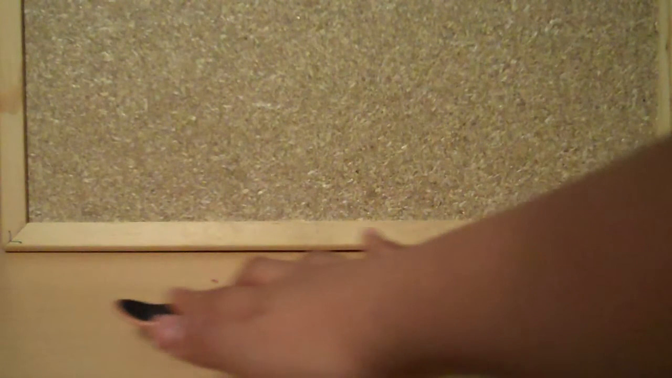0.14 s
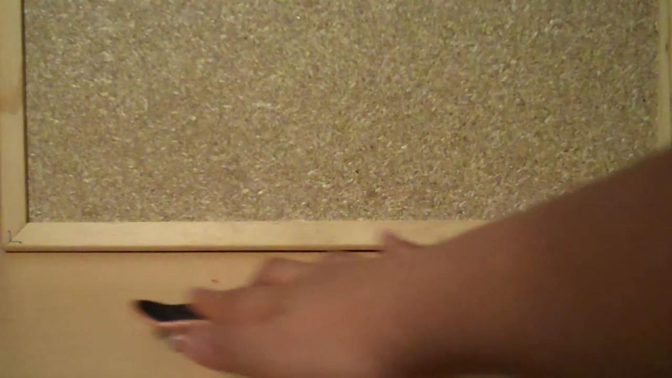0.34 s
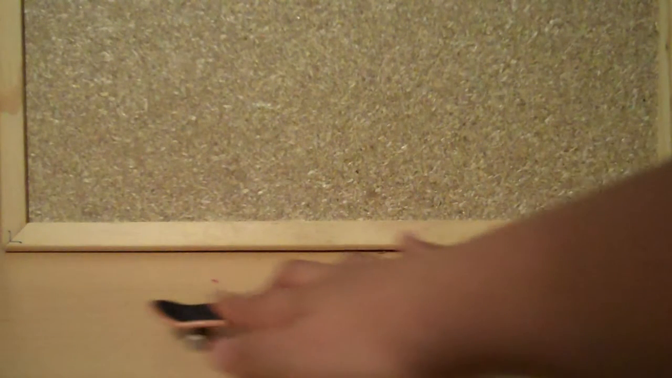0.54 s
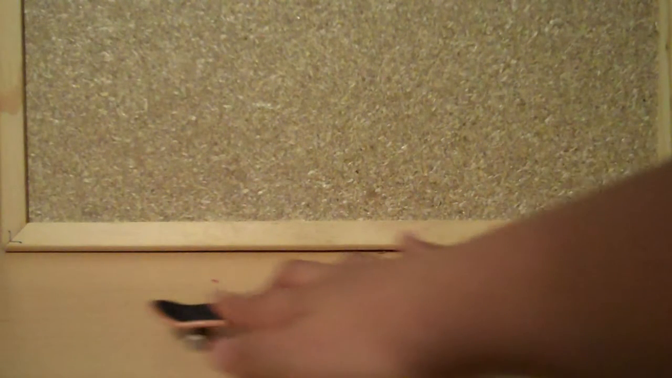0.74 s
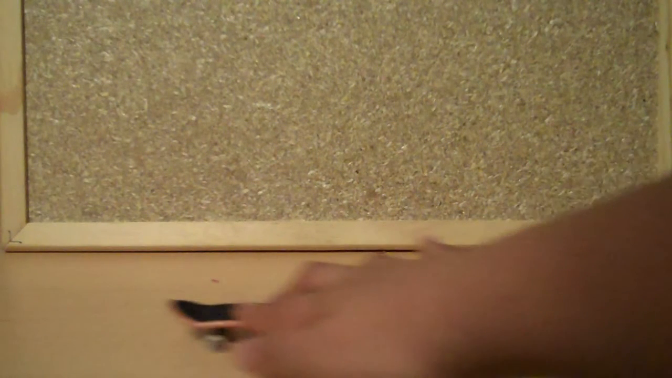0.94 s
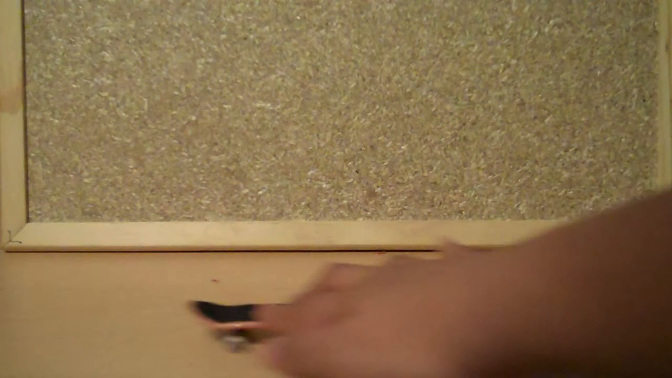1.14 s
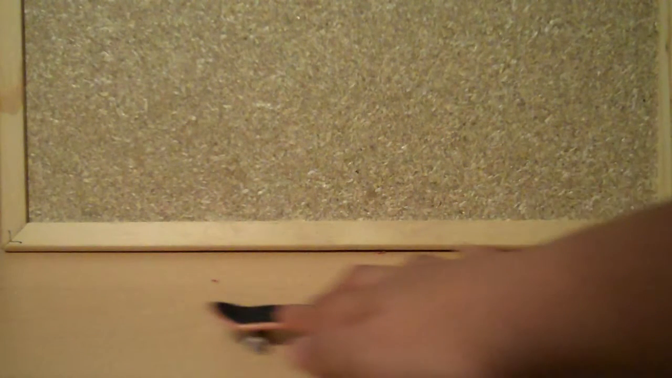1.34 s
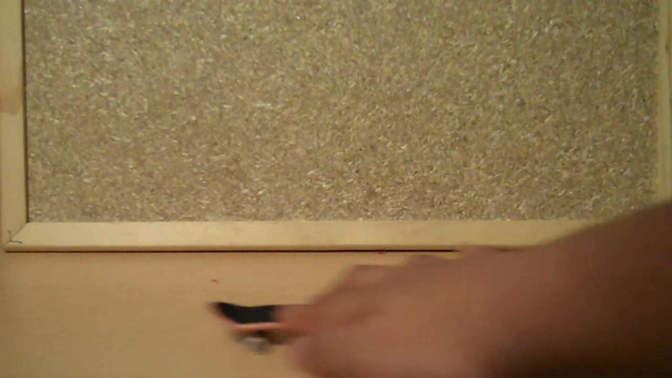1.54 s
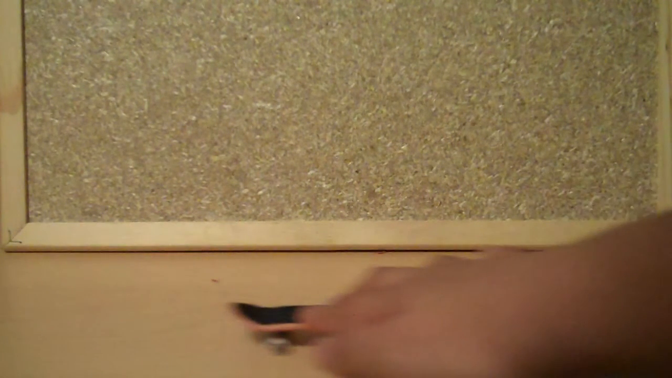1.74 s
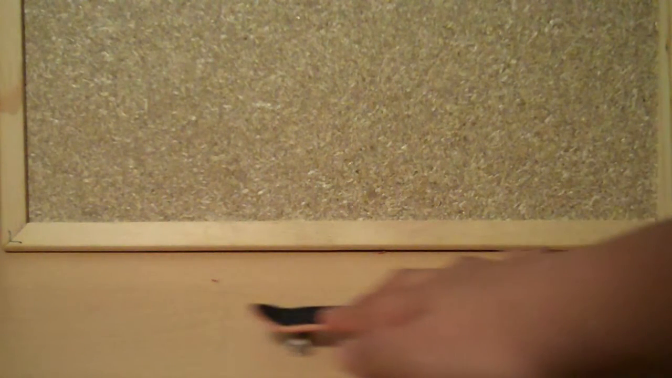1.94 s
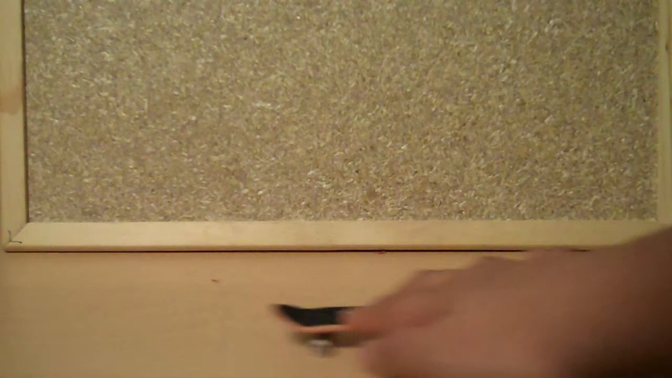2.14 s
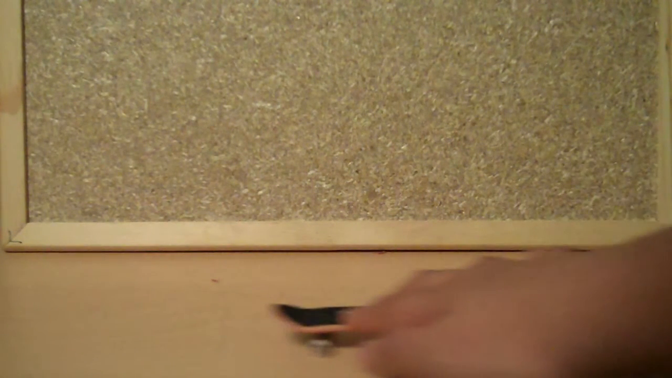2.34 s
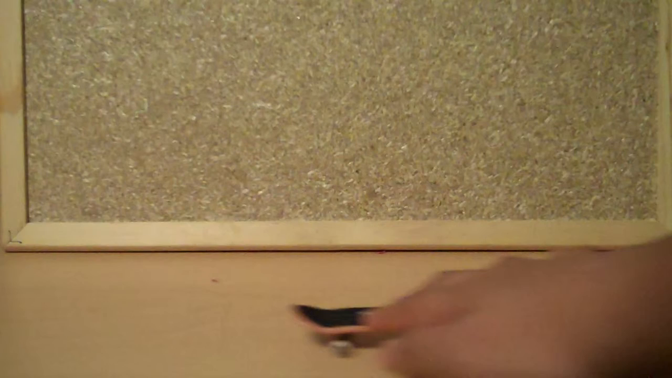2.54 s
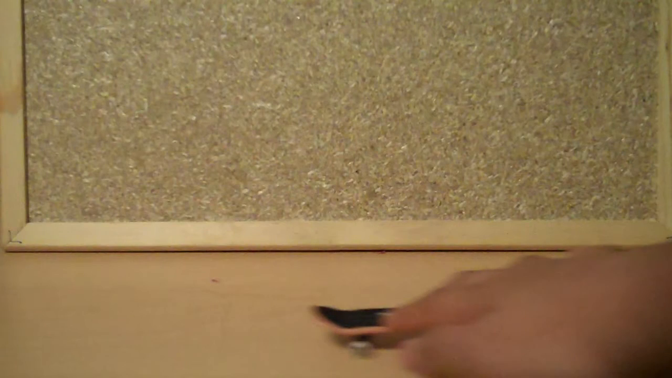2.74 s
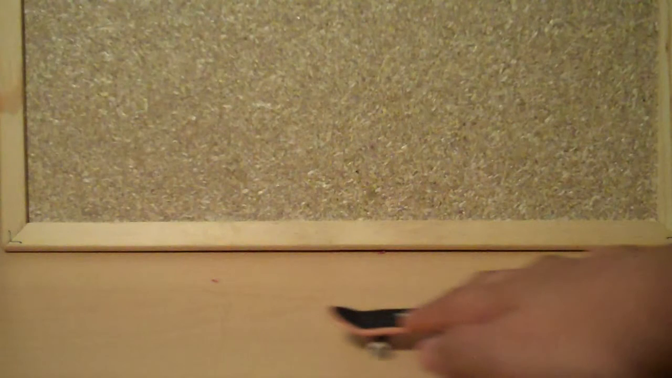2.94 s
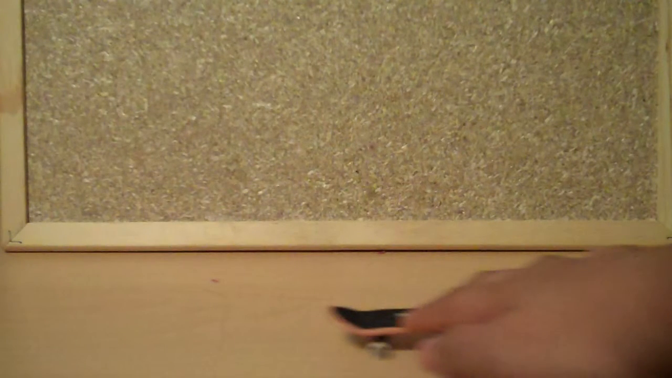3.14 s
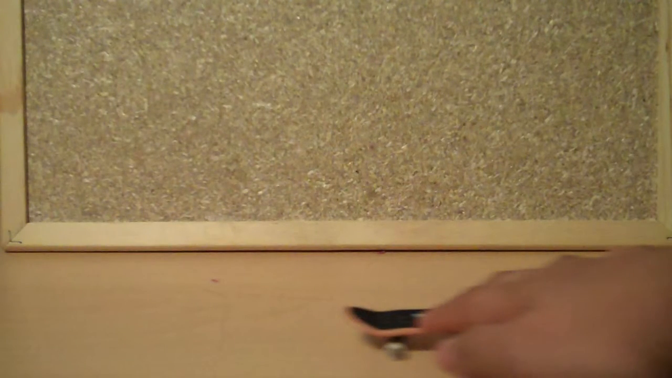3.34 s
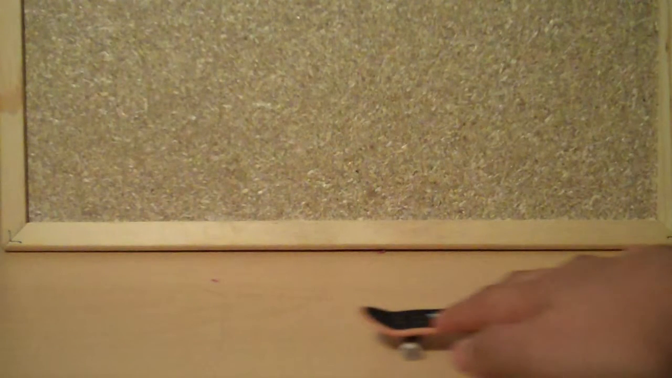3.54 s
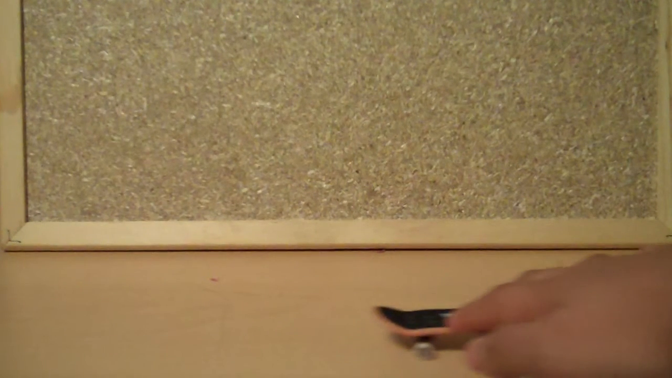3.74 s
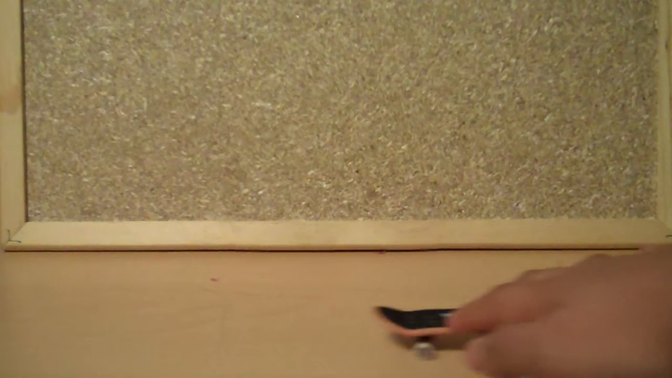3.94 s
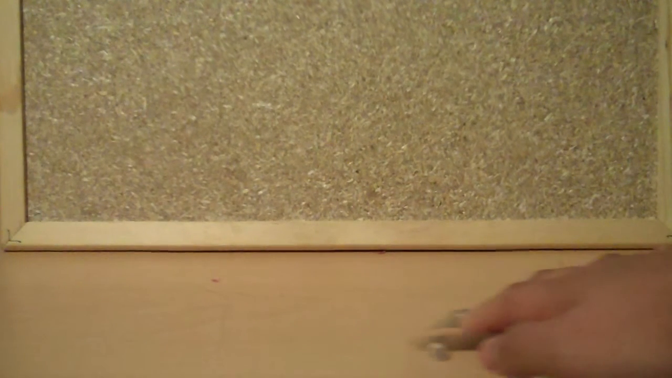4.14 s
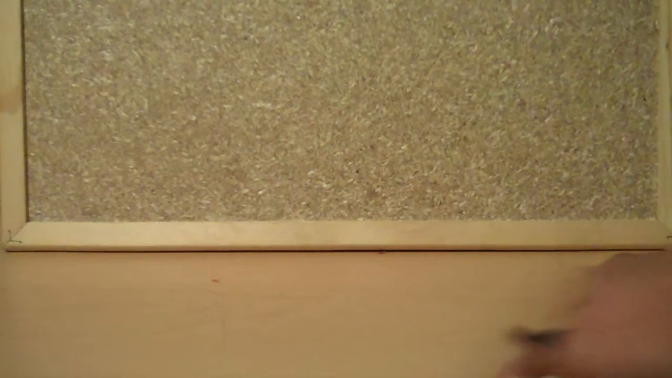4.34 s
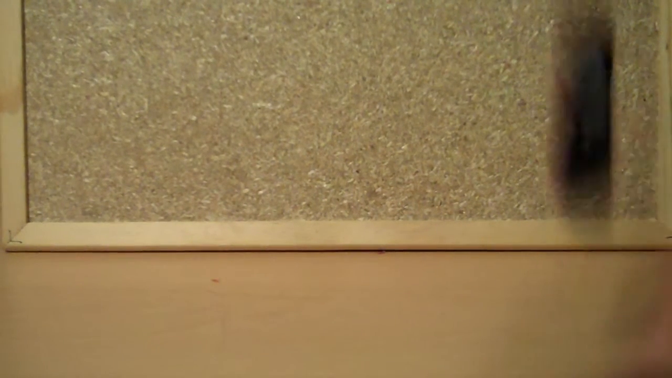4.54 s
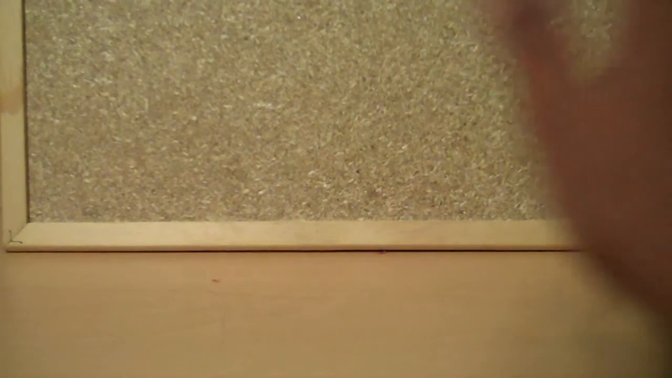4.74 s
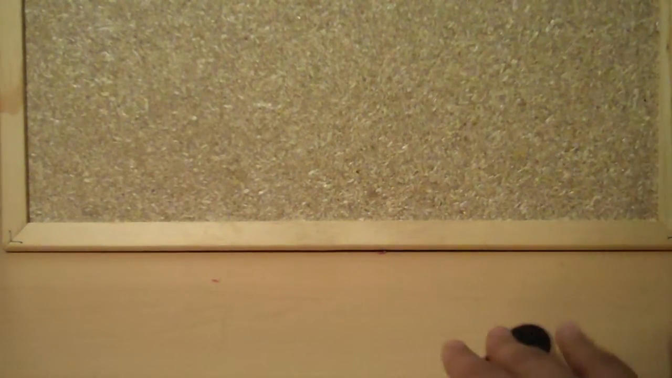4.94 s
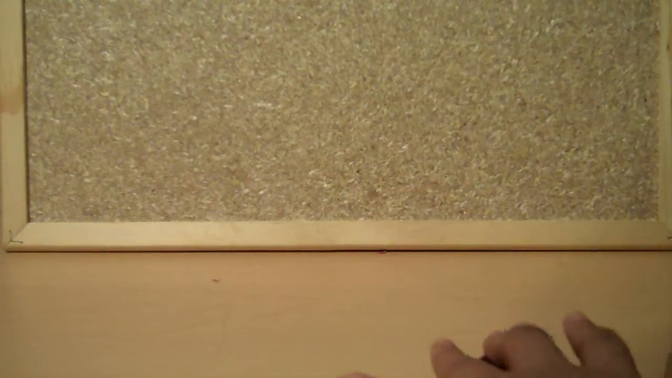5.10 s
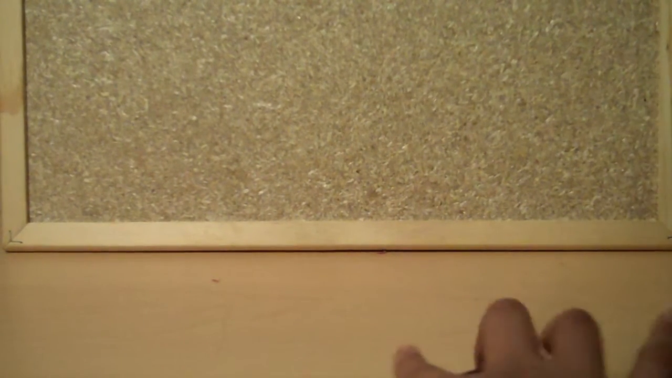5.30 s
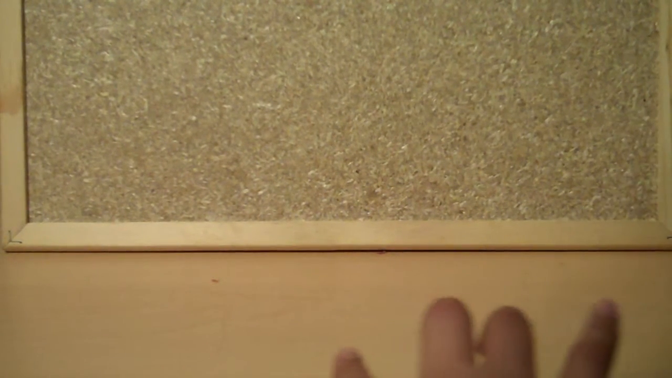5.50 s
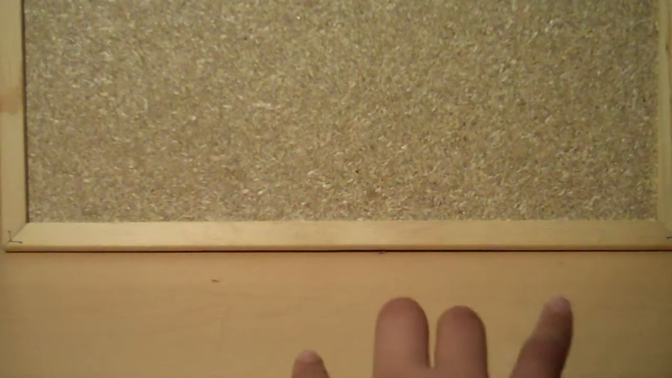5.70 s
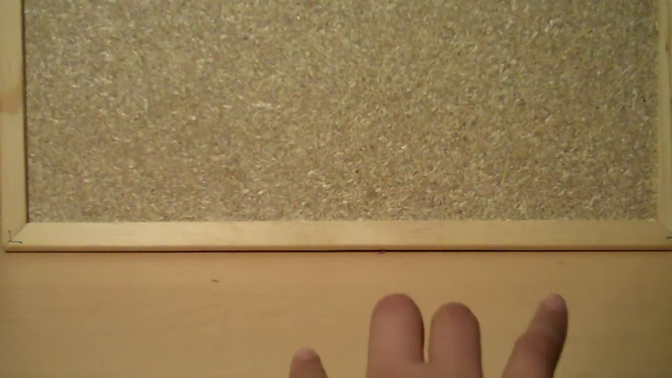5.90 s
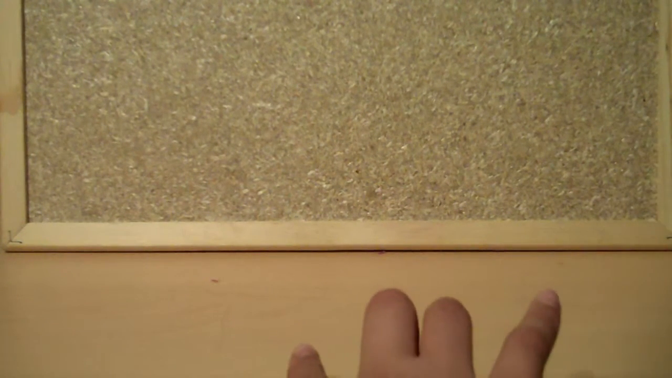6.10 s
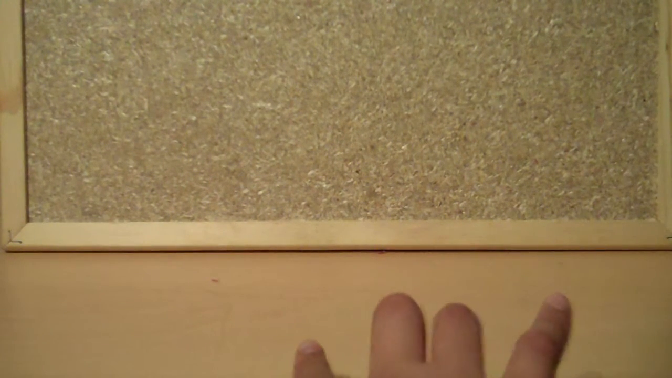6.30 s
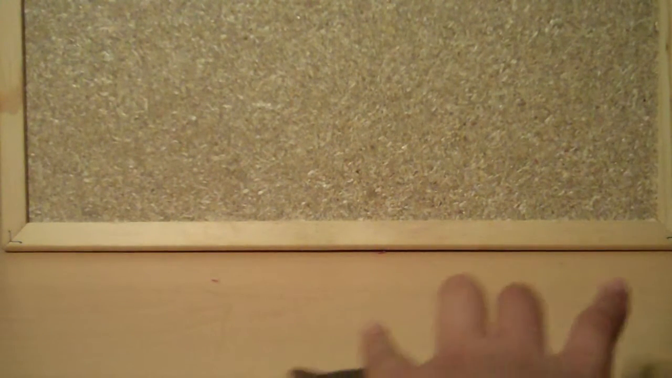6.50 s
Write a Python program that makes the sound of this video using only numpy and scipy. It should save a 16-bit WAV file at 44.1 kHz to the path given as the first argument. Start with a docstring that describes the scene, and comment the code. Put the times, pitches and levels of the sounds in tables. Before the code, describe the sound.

Slowed, glitchy rolling of a finger-sized board on a wooden desk, briefly dropping out, then a sharp pop, loud landing crack and light scraping.

```python
"""Toy skateboard on a wooden desk

Place: a desk in a small room. A finger-sized board rolls in slow motion: noise is cut into snippets that
repeat in a buzz, driving desk and axle resonances; axle ticks repeat in runs. The sound drops out once.
At normal speed the tail scrapes and pops, the board lands hard, slides and ticks: friction noise and struck modes.
Microphone: two ports, each with its own treble resonance, and a clipping limit for the loudest peaks."""
import sys
import numpy as np
from scipy import signal
from scipy.fft import rfft, irfft, next_fast_len
from scipy.io import wavfile
from scipy.ndimage import uniform_filter1d

SR = 44100
rng = np.random.default_rng(int(sys.argv[2]) if len(sys.argv) > 2 else 0)


def transcribe(signal):
    """Save signal, clipped to [-1, 1], as a 16-bit WAV file at the path in sys.argv[1]."""
    frames = np.atleast_2d(signal).T
    limited = np.clip(frames, -1, 1)
    pcm = np.round(limited * 32767).astype(np.int16)
    wavfile.write(sys.argv[1], SR, pcm)


N = 289119

# Table levels are relative: the functions that play them add their own trims.


def amp(db):
    """dB to gain."""
    return 10 ** (np.asarray(db) / 20)


def rms_one(x):
    """Scale to rms 1."""
    return x / np.sqrt(np.mean(x ** 2) + 1e-20)


def evened(x, share, window_s):
    """Rms 1, with a share of the slow swelling taken out."""
    x = rms_one(x)
    power = uniform_filter1d(np.mean(x ** 2, axis=0), round(window_s * SR))
    return rms_one(x / (power + 1e-3) ** (share / 2))


def at_hz(points, hz):
    """Read a table on a log-frequency axis."""
    table = np.array(points)
    return np.interp(np.log(hz), np.log(table[:, 0]), table[:, 1])


def in_time(rows):
    """Columns of a curve, sample by sample; levels are silent outside it."""
    s, *columns = np.transpose(rows)
    return [np.interp(np.arange(N) / SR, s, c, left=-150, right=-150) for c in columns]


def colour(x, gain):
    """Weight the spectrum; gain is a function of Hz."""
    size = next_fast_len(N)
    hz = np.arange(1, size // 2 + 2) * SR / size
    return irfft(rfft(x, size) * gain(hz), size)[..., :N]


def band(x, low_hz, high_hz, order=2):
    """Butterworth band-pass."""
    return signal.sosfilt(signal.butter(order, [low_hz, high_hz], "band", fs=SR, output="sos"), x)


def resonance(x, hz, width_hz):
    """Two-pole peak of gain 1."""
    r = np.exp(-np.pi * width_hz / SR)
    poles = [1, -2 * r * np.cos(2 * np.pi * hz / SR), r * r]
    return signal.lfilter(np.array([1, 0, -1]) * (1 - r * r) / 2, poles, x)


def steep_resonance(x, hz, width_hz, skirt):
    """A resonance followed by a wider one, skirt times its width, so that it falls off faster."""
    return resonance(resonance(x, hz, width_hz), hz, skirt * width_hz)


def peaks_of(x, table):
    """Resonances in parallel, signs alternating; rms 1."""
    peaks = ((-1) ** k * amp(db) * resonance(x, hz, width) for k, (hz, width, db) in enumerate(table))
    return rms_one(sum(peaks))


def ring(push, modes):
    """Struck modes in parallel with alternating signs; the response to a click peaks at 1."""
    click = np.eye(1, SR // 4)[0]
    ringing, response = 0, 0
    for k, (hz, level_db, t60) in enumerate(modes):
        r, w = amp(-60 / (t60 * SR)), 2 * np.pi * hz / SR
        zeros, poles = [0, np.sin(w)], [1, -2 * r * np.cos(w), r * r]
        gain = (-1) ** k * amp(level_db)
        ringing = ringing + gain * signal.lfilter(zeros, poles, push + 1e-18)
        response = response + gain * signal.lfilter(zeros, poles, click + 1e-18)
    return ringing / np.abs(response).max()


# Left-right likeness of rolling, friction and reflections. Columns: frequency_hz, likeness (-1 to 1)
SIDE_LIKENESS = [(60, -0.26), (150, -0.15), (380, 1), (950, 0.92), (2380, 0.8), (5980, 0.19),
                 (15000, -0.54)]


def both_sides(mid, side):
    """Shared and unshared noise mixed into left and right: most alike in the low middle, unlike in the treble."""
    mid = colour(mid, lambda hz: np.sqrt(1 + np.clip(at_hz(SIDE_LIKENESS, hz), -1, 1)))
    side = colour(side, lambda hz: np.sqrt(1 - np.clip(at_hz(SIDE_LIKENESS, hz), -1, 1)))
    return np.array([mid + side, mid - side])


# Microphone ports, left then right. Columns: resonance_hz, width_hz, leak_db
PORTS = [(8113, 1200, -12.5), (6410, 930, -16)]


def ports(x):
    """Each port is a small cavity: a resonant low-pass, with some sound leaking straight through."""
    out = []
    for side, (hz, width, leak_db) in zip(x, PORTS):
        r = np.exp(-np.pi * width / SR)
        poles = [1, -2 * r * np.cos(2 * np.pi * hz / SR), r * r]
        out.append(signal.lfilter([sum(poles)], poles, side) + amp(leak_db) * side)
    return np.array(out)


# Slow motion: a snippet repeats until the next takes over. Columns: start_s, snippet_ms
LOOPS = [(0.0, 24.76), (0.125, 17.0), (0.235, 19.62), (0.355, 23.17), (0.455, 18.3), (0.535, 23.58),
         (0.595, 10.84), (0.675, 20.2), (0.845, 15.83), (0.945, 29.46), (1.095, 26.21), (1.185, 10.11),
         (1.235, 14.49), (1.275, 23.5), (1.375, 45.28), (1.455, 15.58), (1.515, 19.5), (1.645, 17.26),
         (1.755, 16.58), (1.895, 14.35), (1.995, 10.41), (2.065, 15.58), (2.155, 7.41), (2.235, 15.78),
         (2.265, 24.58), (2.375, 16.12), (2.42, 14.0), (2.465, 11.13), (2.525, 18.8), (2.575, 13.2),
         (2.645, 16.73), (2.705, 10.54), (2.785, 14.38), (2.875, 14.95), (3.065, 20.95), (3.145, 15.96),
         (3.215, 12.02), (3.315, 18.96), (3.365, 8.41), (3.415, 22.49), (3.465, 12.74), (3.575, 21.3),
         (3.665, 18.8), (3.922, 9.6), (4.047, 8.41), (4.107, 13.4), (4.157, 18.41), (4.247, 23.61),
         (4.297, 15.78)]
SLOW_END_S = 4.44
# How like one repeat is to the next. Columns: time_s, likeness (0 to 1)
REPEAT_LIKENESS = [(0, 0.67), (1.3, 0.98), (1.5, 0.87), (2.6, 0.92), (3.35, 0.95), (3.5, 0.55), (3.92, 0.6),
                   (4.2, .85), (4.4, 0.1)]
HANDOVER = 0.89   # most that a new snippet's first round takes from the sound just before it
WAVER_SAMPLES = 0.45   # a repeat comes a little late now and then


def slow_motion(x, hold):
    """Each snippet plays again and again, fresh sound mixed in every round; a lower hold repeats closer."""
    out = x.copy()
    ends = [s for s, ms in LOOPS[1:]] + [SLOW_END_S]
    for (s, ms), end_s in zip(LOOPS, ends):
        start, end, lag = round(s * SR), round(end_s * SR), round(ms * SR / 1000)
        like = np.clip(np.interp(s, *np.transpose(REPEAT_LIKENESS)), 0, .995) ** hold
        for i in range(max(start, lag), end, lag):
            stop = min(i + lag, end)
            keep = np.clip(HANDOVER, 0, like) if i == start else like
            late = round(abs(WAVER_SAMPLES * rng.standard_normal())) * (i > 2 * lag)
            back = lag + late
            out[:, i:stop] = keep * out[:, i - back:stop - back] + np.sqrt(1 - keep ** 2) * x[:, i:stop]
    return out


def grit(lumpy_db, lump_hz, hold):
    """Wood grain under the board: noise in uneven lumps, repeated in slow motion."""
    slow = signal.butter(2, lump_hz, fs=SR, output="sos")
    lumps = rms_one(signal.sosfilt(slow, rng.standard_normal(N)))
    grains = rms_one(rng.standard_normal((2, N)) * amp(lumpy_db * lumps))
    return both_sides(*slow_motion(grains, hold=hold))


TONE_GLIDE_S = 0.014


def on_repeat(hz):
    """A clear tone held on the multiple of the repeat rate nearest to hz; rms 1."""
    t, loops = np.arange(N) / SR, np.array(LOOPS)
    period_s = loops[np.searchsorted(loops[:, 0], t, "right") - 1, 1] / 1000
    held_hz = uniform_filter1d(np.round(hz * period_s) / period_s, round(TONE_GLIDE_S * SR) + 1)
    return np.sqrt(2) * np.sin(2 * np.pi * np.cumsum(held_hz) / SR) * (t < SLOW_END_S)


# Room and microphone noise. Columns: frequency_hz, level_db
AIR = [(15, -16.5), (25, -17), (173, -16.5), (257, -12), (301, -13.5), (703, -13.5), (940, -13.5),
       (1070, -9.5), (1230, -15), (8240, -24), (14000, -25)]
AIR_DB = -60.5


def air():
    """Steady noise floor of room and microphone, repeated along with the slow-motion snippets."""
    noise = slow_motion(rng.standard_normal((2, N)), hold=0.69)
    return amp(AIR_DB) * rms_one(colour(noise, lambda hz: amp(at_hz(AIR, hz))))


# Clear tones of the two lower singing resonances: pitch_hz of each
WHINE_HZ = (928.3, 1162.6)
WHINE_DB = 3   # re the noisy ringing around them


def whine():
    """The strongest partial of the two lower singing resonances runs on through the slow motion."""
    return [amp(WHINE_DB) * on_repeat(hz) for hz in WHINE_HZ] + [0]


# Wheels in slow motion, before and after the dropout. Columns: time_s, rumble_db, then re the rumble:
# rattle_db, hiss_db, first_singing_db, second_singing_db
ROLL = [
    [(0.0, -47.5, -13.5, -15.5, -9, -2), (0.17, -40.5, -15.5, -18.5, -23, -4),
     (0.56, -38.5, -14, -16.5, -8, -1), (0.66, -39, -13.5, -21, -6, -2.5),
     (0.91, -35, -11.5, -16, -11, -3.5), (1.07, -36, -9, -9.5, 0, -0.5), (1.23, -35.5, -8, -11.5, -4, 2),
     (1.36, -31, -11.5, -13, -3, -2.5), (1.37, -36.5, -10.5, -15, 4, 2.5),
     (1.5, -34.5, -11, -14.5, -2.5, -1.5), (2.12, -34.5, -16, -16, -13, -2.5),
     (2.18, -39, -12, -11, -1, -3), (2.37, -32.5, -14.5, -15, -6, -11), (2.44, -34, -16, -19, -9, -2),
     (2.69, -35.5, -14.5, -16.5, -11.5, -2), (2.87, -34, -18.5, -20.5, -12.5, -13.5),
     (3.02, -36, -12.5, -15, -8.5, -7.5), (3.18, -34, -14.5, -12.5, -9.5, -5),
     (3.29, -36.5, -14.5, -10.5, -19, -4), (3.41, -38.5, -14.5, -10.5, -5.5, -14),
     (3.58, -36, -16, -14.5, -14.5, -3.5), (3.776, -44, -9.5, -5, -4, -13)],
    [(3.93, -63, -12, -4, -23, -1), (3.968, -48, -13.5, -5.5, -3, -7), (4.064, -41, -14, -7, -8.5, -5.5),
     (4.214, -40, -16, -12.5, -12, -11), (4.364, -47.5, -12, -3.5, -12.5, -18),
     (4.45, -45, -16, -16, -14, -4)],
]
# Strokes at normal speed. Columns: start_s, rise_s, hold_s, fade_s, rumble_db, then re it rattle_db, hiss_db
STROKES = [(4.446, 0.061, 0.012, 0.059, -33, -5.5, -4), (4.632, 0.0095, 0.046, 0.19, -48.5, -11.5, -4.5),
           (6.414, 0.083, .05, 0.02, -56.5, -6.5, -3.5)]
STROKE_EDGE_DB = -15.5   # at both ends, re the held part
# The two lower singing resonances during strokes: level_db of each, re the rumble
STROKE_SING_DB = (-14.5, -3.5)


def wheel_levels():
    """Rumble, rattle, hiss and singing levels in time; the wheels rest between strokes."""
    passes = list(ROLL)
    for s, rise, hold, fade, db, rattle, hiss in STROKES:
        corners = zip(np.cumsum([0, rise, hold, fade]), [STROKE_EDGE_DB, 0, 0, STROKE_EDGE_DB])
        passes.append([(s + lag, db + edge, rattle, hiss, *STROKE_SING_DB) for lag, edge in corners])
    rows = []
    for rows_on in passes:
        first, last = rows_on[0], rows_on[-1]
        rows.append((first[0] - .002, -90, *first[2:]))
        rows += [tuple(row) for row in rows_on]
        rows.append((last[0] + .002, -90, *last[2:]))
    rows = np.array(rows)
    times = np.maximum.accumulate(rows[:, 0])
    return [np.interp(np.arange(N) / SR, times, column) for column in rows.T[1:]]


def throb_db(runs):
    """A cosine swing of level through each run of throbs."""
    t, out = np.arange(N) / SR, 0
    for first, last, gap_ms, depth_db in runs:
        gap = (last - first) / max(round((last - first) * 1000 / gap_ms), 1)
        inside = (t > first - gap / 4) * (t < last + gap / 4)
        out = out + depth_db * np.cos(2 * np.pi * (t - first) / gap) * inside
    return out


# Desk resonances under the wheels. Columns: pitch_hz, width_hz
DESK = [(390, 45), (605, 23), (790, 70), (1350, 30), (1600, 62), (2050, 110)]
# They swell and fade as the wheels move along, before and after the dropout.
# Columns: time_s, then level_db of each desk resonance
DESK_LEVELS = [
    [(0.0, -59, -61, -60, -60, -59, -68), (0.07, -71, -68, -62, -59, -58, -65),
     (0.28, -56, -57, -52, -60, -54, -59), (0.42, -61, -60, -63, -59, -57, -60),
     (0.53, -57, -57, -66, -65, -67, -51), (0.64, -52.5, -53, -44, -65, -60, -62),
     (0.71, -49.5, -52, -46, -50, -54, -56), (0.93, -59, -60, -53, -49, -55, -52),
     (1.17, -54, -63, -52, -56, -47, -49), (1.21, -52, -61, -47, -59, -60, -52),
     (1.37, -54.5, -54, -48, -53, -45, -47), (1.51, -59, -51, -42, -51, -62, -43),
     (1.81, -53, -46, -54, -42, -44, -44), (1.9, -54, -59, -58, -42, -50, -49),
     (1.96, -61, -52, -50, -47, -50, -55), (2.03, -53.5, -48, -58, -42, -58, -54),
     (2.14, -64, -43.5, -58, -50, -51, -45), (2.18, -56, -70, -64, -49, -48, -47),
     (2.39, -52.5, -50, -51, -40, -60, -36.5), (2.45, -57, -67, -48, -57, -50, -45),
     (2.53, -54, -61, -59, -49, -47, -60), (2.64, -53, -47, -56, -52, -59, -62),
     (2.81, -66, -55, -51, -37, -49, -54), (2.88, -49.5, -48, -55, -37, -51, -56),
     (3.09, -55.5, -50, -51, -61, -61, -57), (3.15, -63, -47, -46, -45, -49, -54),
     (3.26, -68, -52, -57, -45, -47, -54), (3.36, -56, -47, -55, -40.5, -47, -55),
     (3.39, -58, -48, -52, -46, -60, -57), (3.47, -54, -60, -69, -43, -59, -59),
     (3.62, -58.5, -54, -55, -44, -47, -53), (3.7, -69, -66, -62, -48, -61, -61),
     (3.75, -64, -53, -54, -51, -59, -65), (3.79, -75, -67, -63, -59, -58, -66)],
    [(3.93, -93, -93, -83, -71, -68, -74), (3.98, -81, -70, -54, -63, -50.5, -63),
     (4.054, -68, -59, -48, -60, -42, -65), (4.13, -61, -50.5, -51, -60, -54, -64),
     (4.322, -76, -68, -63, -51, -59, -60), (4.406, -67, -68, -69, -55, -62, -66),
     (4.44, -74, -70, -64, -63, -57, -64)],
]


def desk_ring(grain):
    """Grit sets the desk resonances ringing, each on its own level curve."""
    gains = sum(amp(in_time(rows)) for rows in DESK_LEVELS)
    out = 0
    for k, ((hz, width), gain) in enumerate(zip(DESK, gains)):
        out = out + (-1) ** k * gain * evened(steep_resonance(grain, hz, width, 3), share=.6, window_s=.03)
    return out


# Wood rumble between the desk resonances. Columns: frequency_hz, level_db
RUMBLE = [(100, -34), (230, -13.5), (450, -2.5), (800, 4.5), (1200, -2), (2000, -9), (2600, -14.5),
          (3500, -49)]
# The three strongest resonances of the roll. Columns: pitch_hz, width_hz
SINGING = [(925, 150), (1165, 130), (1830, 380)]
SING_TOP_DB, SING_TOP_FOLLOWS = 7.5, 0.91   # the top one follows this share of the rattle's dB
# Rattling axles and deck. Columns: pitch_hz, width_hz, level_db
RATTLE = [(2906, 130, 20), (3320, 94, 26), (3536, 250, -5), (4074, 67, 31.5), (4570, 28, 8.5)]
# Level throbs of the roll, deepest in the hiss. Columns: first_peak_s, last_peak_s, gap_ms, depth_db
THROBS = [(0.95, 1.056, 30.7, 2.5), (1.074, 1.09, 15, 6.5), (1.113, 1.169, 27.5, 3),
          (1.206, 1.236, 10.2, 4.5), (1.251, 1.266, 14.5, 5), (1.289, 1.361, 24, 5.5),
          (1.395, 1.44, 45, 6.5), (2.067, 2.139, 15.6, 6.5), (2.279, 2.354, 25, 3),
          (2.378, 2.411, 16.3, 2.5), (2.893, 2.994, 14.7, 4), (3.006, 3.142, 7.2, 6),
          (3.168, 3.215, 15.7, 3), (3.258, 3.319, 12.8, 4), (3.338, 3.355, 20, 5.5)]
RATTLE_THROB = 0.79   # share of the throb in the rattle
# Throbs of the wood rumble, with their own timing. Columns: first_peak_s, last_peak_s, gap_ms, depth_db
WOOD_THROBS = [(1.067, 1.097, 15, 3.5), (1.123, 1.178, 27.5, 3.5), (1.205, 1.226, 10.3, 4),
               (1.243, 1.258, 14.5, 2), (1.324, 1.373, 24.5, 3.5), (2.267, 2.342, 25, 1.5),
               (2.382, 2.415, 16.3, 4), (2.427, 2.455, 14, 3.5), (2.473, 2.485, 12, 3),
               (2.504, 2.557, 18, 2.5), (2.649, 2.699, 16.7, 4), (2.913, 3.049, 15.1, 3),
               (3.069, 3.132, 21, 3.5), (3.59, 3.656, 22, 3.5)]
HISS_TOP_DB = -19.5   # the hiss reaches faintly above the port resonances


def rolling():
    """Grit drives the desk resonances, the rattling axles and a bright hiss."""
    wood_db, rattle_db, hiss_db, *sing_db = wheel_levels()
    sing_db.append(SING_TOP_DB + SING_TOP_FOLLOWS * rattle_db)
    coarse = grit(lumpy_db=-2.5, lump_hz=121.0, hold=0.65)
    fine = grit(lumpy_db=5.5, lump_hz=304, hold=1.0)

    rumble = colour(coarse, lambda hz: amp(at_hz(RUMBLE, hz)))
    wood = amp(-14.5) * evened(rumble, share=0.18, window_s=0.064)
    for k, ((hz, width), db, tone) in enumerate(zip(SINGING, sing_db, whine())):
        ringing = evened(steep_resonance(coarse, hz, width, 4), share=0.12, window_s=0.0086)
        wood += (-1) ** k * amp(db - 6.5) * (tone + ringing)

    chatter = peaks_of(fine, RATTLE) + amp(3) * rms_one(band(fine, 2200, 5200))
    rattle = evened(band(chatter, 1700, 12000), share=0.18, window_s=0.023)

    bright = band(grit(lumpy_db=4.5, lump_hz=293.3, hold=1.0), 5200, 8700)
    hiss = evened(ports(bright), share=0.89, window_s=0.067)
    hiss = hiss + amp(HISS_TOP_DB) * rms_one(band(fine, 6700, 20000))

    throb, pulse = throb_db(THROBS), amp(throb_db(WOOD_THROBS))
    wheels = pulse * wood + amp(rattle_db + RATTLE_THROB * throb) * rattle + amp(hiss_db + throb) * hiss
    return amp(-4.5) * pulse * desk_ring(coarse) + amp(wood_db) * wheels


# Slow motion repeats one axle tick, rattle or deck knock in even runs. Columns: first_s, last_s, gap_ms,
# tick_db, rattle_db, jingle_db, knock_db, contact_ms,
# knock_lag_ms (a negative lag wraps to the end of the 45 ms burst)
REPEATED_TICKS = [(.7218, .8026, 20.2, -27.5, -44, -44, -41.5, 0.62, 7),
                  (.953, 1.018, 32.5, -47, -42, -34, -39.5, 3.2, 7),
                  (1.048, 1.086, 19, -38, -41.5, -31, -36.5, 3.9, 7),
                  (1.109, 1.166, 28.5, -34, -43, -31.5, -38, 5.1, 7),
                  (1.204, 1.234, 10.1, -36, -42, -53, -43.5, 0.93, 7),
                  (1.2485, 1.263, 14.5, -39, -26.5, -43, -39, 0.97, 6.5),
                  (1.285, 1.3074, 22.4, -32, -28.5, -51, -29.5, 2.5, 6.6),
                  (1.3319, 1.3568, 25, -33, -28.5, -52.5, -29, 2.9, 7),
                  (1.3872, 1.4325, 45.3, -37, -33.5, -52.5, -28, 4.1, 6.5),
                  (2.278, 2.352, 24.6, -52, -44, -47, -39, 1.5, -0.5),
                  (2.3765, 2.4095, 16.4, -51, -46, -46, -42, 1.2, -1),
                  (2.472, 2.484, 12, -55, -52, -49, -47, 1, 0),
                  (2.503, 2.556, 17.8, -55, -52, -42, -46, 1, 0)]
COPY_SPREAD_DB, COPY_FRESH = 1.5, 0.13   # level scatter; new sound mixed into each copy
# Single dry ticks of the axle. Columns: time_s, tick_db
TICKS = [(.8265, -27), (.839, -24), (0.846, -24), (.8595, -29), (.865, -29), (.875, -28), (0.8802, -25),
         (.8915, -25), (0.903, -30), (.909, -22), (0.918, -27), (0.929, -25), (0.936, -22.5), (.969, -33),
         (0.975, -26), (1, -30), (1.0064, -23), (1.036, -21.5)]
TICK_RATTLE_DB, TICK_MS = -18, 0.63   # rattle re the tick; contact time
# Struck axle. Columns: pitch_hz, width_hz, level_db
AXLE = [(2810, 80, 5.5), (3150, 115, 9.5), (3600, 110, 5), (3710, 83, 0.5), (4010, 62, -4.5)]
# Upper axle ring. Columns: pitch_hz, width_hz, level_db
JINGLE = [(3000, 93, -3), (4010, 70, -2), (4700, 82, -4.5), (6740, 90, -16.5), (7520, 150, -9),
          (8250, 230, -14)]
# The deck's knock. Columns: pitch_hz, level_db, t60_s
KNOCK = [(1806, 0.5, 0.037), (1864, 0.5, 0.049), (1984, -12, .02)]


def axle_ticks(tick_db, rattle_db, jingle_db, knock_db):
    """Slow motion repeats one axle tick, rattle or deck knock in even runs, each a near copy; some tick once."""
    pushes, t = np.zeros((4, N)), np.arange(2000) / SR
    click = np.eye(1, 2000)[0]
    single = [(s, s, 1, db, db + TICK_RATTLE_DB, -90, -90, TICK_MS, 0) for s, db in TICKS]
    runs = REPEATED_TICKS + single
    for (first, last, gap, *levels_db, ms, lag_ms), held in zip(runs, rng.standard_normal((len(runs), 2000))):
        phase = t * 1000 / ms   # the contact noise peaks at phase 1
        late_click = np.roll(click, round(lag_ms * SR / 1000))
        for s in np.linspace(first, last, round((last - first) * 1000 / gap) + 1):
            noise = rng.standard_normal(2000)
            chatter = (held + COPY_FRESH * noise) * phase * np.exp(1 - phase)
            gains = amp(levels_db + COPY_SPREAD_DB * noise[-4:])
            shapes = [chatter + 3 * click, 0.94 * chatter + 9 * click, 0.95 * chatter + 12 * click, late_click]
            pushes[:, round(s * SR):round(s * SR) + 2000] += gains[:, None] * shapes
    tick, rattle, jingle, knock = pushes + 1e-18
    rattle = sum(amp(db) * steep_resonance(rattle, hz, width, 4) for hz, width, db in AXLE)
    jingle = sum(amp(db) * steep_resonance(jingle, hz, width, 4) for hz, width, db in JINGLE)
    tick_and_rattle = amp(tick_db) * band(tick, 6100, 12000) + amp(rattle_db) * rattle
    return tick_and_rattle + amp(jingle_db) * jingle + amp(knock_db) * ring(knock, KNOCK)


# Late in the roll one tone moves above the two singing ones and another runs below.
# Columns: time_s, upper_hz, upper_db, lower_hz, lower_db
EXTRA_TONES = [(2.55, 1290, -64, 791, -63), (2.72, 1320, -42, 790, -59), (2.95, 1325, -57, 799, -44),
               (3.2, 1337, -45.5, 820, -53.5), (3.27, 1415, -49, 835, -52), (3.55, 1400, -54, 833, -62),
               (3.7, 1343, -55, 800, -65), (3.775, 1328, -51, 880, -51)]


def extra_tones():
    """Two more partials of the repeat rate stand out for a while."""
    upper_hz, upper_db, lower_hz, lower_db = in_time(EXTRA_TONES)
    return amp(upper_db) * on_repeat(upper_hz) + amp(lower_db) * on_repeat(lower_hz)


# A narrow bright hiss swells in the roll. Columns: time_s, level_db
SHEEN = [(2.78, -80), (2.84, -52), (2.94, -50), (3.066, -42), (3.2, -49), (3.246, -67), (3.256, -44.5),
         (3.36, -48), (3.372, -80)]
# Its resonances. Columns: pitch_hz, width_hz, level_db
SHEEN_PEAKS = [(5560, 300, -5), (5640, 170, -1.5), (6050, 310, 1.5), (6385, 200, 1), (6750, 220, -5)]


def sheen():
    """Grit through a cluster of bright resonances, throbbing with the hiss of the roll."""
    level_db, = in_time(SHEEN)
    noise = peaks_of(grit(lumpy_db=0.5, lump_hz=200, hold=1.0), SHEEN_PEAKS)
    return amp(level_db + throb_db(THROBS)) * evened(noise, share=0.82, window_s=0.05)


# The tail drags on the desk before the pop. Columns: pitch_hz, width_hz, level_db
SCRAPE = [(1300, 250, -3.5), (1670, 160, -4)]
SCRAPE_PEAK_S, SCRAPE_WIDTH_S, SCRAPE_DB = 4.517, 0.019, -31


def scrape():
    """A swell of friction noise in two broad resonances."""
    noise = both_sides(*rng.standard_normal((2, N)))
    swell = np.exp(-.5 * ((np.arange(N) / SR - SCRAPE_PEAK_S) / SCRAPE_WIDTH_S) ** 2)
    return amp(SCRAPE_DB) * swell * peaks_of(noise, SCRAPE)


TAIL_UNTIL_S = 4.8   # up to here the tail strikes, later the wheels


def struck(push, modes):
    """The tail and the wheels weight the same modes differently."""
    tail, table = np.arange(N) < TAIL_UNTIL_S * SR, np.array(modes)
    return ring(push * tail, table[:, [0, 1, 3]]) + ring(push * ~tail, table[:, [0, 2, 3]])


# Deck modes. Columns: pitch_hz, tail_db, wheels_db, t60_s
DECK = [(1127, -9.5, -8, 0.02), (1395, -9.5, -3.5, 0.014), (1683, -6, -7, 0.021), (1850, -6, -3.5, 0.018),
        (2005, 1, -0.5, 0.022), (2164, -9, -1, 0.012), (2374, -6, -4.5, 0.021), (2640, -10, -2, 0.0086),
        (2820, -10.5, -5.5, 0.027), (3078, -5.5, -3, .012), (3283, -12.5, -12.5, 0.0082)]
# Desk top modes. Columns: pitch_hz, tail_db, wheels_db, t60_s
THUD = [(223, -12.5, -20.5, .09), (284, -5, -9, .07), (323, -6, -12.5, 0.053), (389.5, -7, -1, .065),
        (480, -6, -10, 0.046), (602, -11.5, -6.5, 0.096), (719.5, -7.5, -9, 0.035), (840, 1, -6.5, 0.067),
        (947, -0.5, -9, .04)]
SOFT_CONTACT_MS = 0.38   # the heavy desk feels a smooth one-sided push, peaking at half this time
JOLT_HZ, JOLT_DB = 65.4, -15.5   # heavy blows also shake the microphone through the desk


def knocks(rows, crack_db, deck_db, thud_db):
    """Each blow is a short dying burst of contact noise for crack and deck, and a soft push for the desk."""
    pushes, t = np.zeros((3, N + 2000)), np.arange(2000) / SR
    soft = t * np.exp(-t * 2000 / SOFT_CONTACT_MS)
    for (s, *levels_db, ms), noise in zip(rows, rng.standard_normal((len(rows), 2000))):
        burst = noise * np.exp(-t * 1000 / ms)
        shapes = [burst / np.abs(burst).max(), burst / np.linalg.norm(burst), soft / soft.sum()]
        pushes[:, round(s * SR):round(s * SR) + 2000] += amp(levels_db)[:, None] * shapes
    crack, deck, thud = pushes[:, :N] + 1e-18
    jolt = amp(JOLT_DB) * SR / JOLT_HZ / 20 * band(thud, 7.7, JOLT_HZ)
    desk = band(struck(thud, THUD), 190, 3000) + jolt
    return amp(crack_db) * band(crack, 2300, 12000) + amp(deck_db) * struck(deck, DECK) + amp(thud_db) * desk


# Decay of the small room. Columns: frequency_hz, t60_s
ROOM_TAIL = [(150, 0.13), (500, 0.12), (2000, 0.14), (6000, 0.14), (12000, 0.11)]
LATE_DB, LATE_STRETCH, LATE_FROM_HZ = -22, 2.7, 700   # a fainter, slower second decay without bass


def room(x):
    """Dense reflections: noise dying octave by octave."""
    t, tail = np.arange(SR) / SR, 0
    white = [both_sides(*rng.standard_normal((2, N)))[:, :SR] for k in range(2)]   # neighbouring octaves unrelated
    for k, hz in enumerate(125 * 2. ** np.arange(8)):
        fall_db = -60 * t / at_hz(ROOM_TAIL, hz)
        late = amp(LATE_DB + fall_db / LATE_STRETCH) * (hz > LATE_FROM_HZ)
        octave = band(white[k % 2], hz / np.sqrt(2), min(hz * np.sqrt(2), SR / 2.5))
        tail = tail + octave * (amp(fall_db) + late)
    tail = tail * np.clip(t / 0.00014, 0, 1)
    return signal.fftconvolve(x[None], tail / np.linalg.norm(tail, axis=1, keepdims=True))[:, :N]


# The hand drags the board away. Columns: time_s, low_db, middle_db, high_db
DRAG = [(5.15, -66, -77, -83), (5.2, -55.5, -66, -61), (5.28, -52, -66, -49.5), (5.33, -49, -54.5, -49.5),
        (5.4, -53, -60, -50.5), (5.49, -48.5, -55, -44), (5.56, -53.5, -50.5, -53), (5.63, -53, -61, -54),
        (5.72, -54.5, -63.5, -55), (5.77, -59, -64, -63), (5.859, -67, -80, -76), (5.9, -86, -93.5, -89)]
# Low, middle and high rub resonances. Columns of each: pitch_hz, width_hz, level_db
DRAG_LOW = [(378, 260, -7), (876, 195, -3), (1256, 350, -3.5), (1980, 170, 2), (2570, 220, -3),
            (3230, 560, -6)]
DRAG_MIDDLE = [(4000, 330, -2), (4450, 150, 0.5)]
DRAG_HIGH = [(6220, 390, -1.5), (7040, 410, -6), (7750, 350, -7.5), (8800, 730, -8.5), (11500, 5300, -16)]


def drag():
    """Lumpy friction noise in three groups of resonances."""
    rub = grit(lumpy_db=2.5, lump_hz=50, hold=1)
    out = 0
    for db, table in zip(in_time(DRAG), (DRAG_LOW, DRAG_MIDDLE, DRAG_HIGH)):
        heard = db > -100
        group = rms_one(ports(peaks_of(rub, table)) * heard) * np.sqrt(np.mean(heard))   # rms 1 while heard
        out = out + amp(db) * group
    return out


# Blows of tail, board and wheels. Columns: time_s, crack_db, deck_db, thud_db, contact_ms, echo_db (re blow)
BLOWS = [(4.468, -35, -47, -74, 1.3, 11), (4.473, -27, -32.5, -72, 4.6, -1), (4.5575, -28, -50, -70, 1, -1),
         (4.5636, -17.5, -40, -66, 1.5, -8), (4.5806, 4, -14, -29, 3.5, -6.5),
         (4.5978, -40, -27.5, -46, 3.8, 2), (4.928, -30, -61, -66, 2, -7),
         (4.9307, -15.5, -59, -67, 3.1, -4.5), (4.964, -26, -29, -70, 1.5, -8),
         (4.9663, 8.5, -9.5, -20, 2.2, -6), (4.9685, 0.5, -2.5, -16, 1.3, -0.5),
         (4.9785, -13, -24, -40, .8, -10), (4.9844, -3, -12, -22.5, 2, -3.5),
         (4.9938, -10, -14, -23, 1.7, -3), (4.9978, -18, -25, -37, 1.5, -6),
         (5.1514, -33, -39.5, -59, 2, -5), (5.332, -51, -37, -70, 2.7, -9),
         (5.3397, -21.5, -40, -81, .6, -6.5), (5.347, -24, -52, -76, 0.77, -13),
         (5.35, -31, -41, -77, 1.2, -5), (5.4961, -40, -60, -75, 2, -1), (5.547, -35, -49, -68, 2, -3),
         (5.5514, -29, -58, -77, 2, 0), (5.576, -19.5, -63, -56, 0.87, -9),
         (5.7018, -38.5, -57, -79, 2, -3), (6.4602, -39.5, -56.5, -76.5, 2.4, -7)]
ROLL_PAN_DB = -0.46   # left minus right
TREBLE_STOP_HZ = 14382


def scene():
    """Roll, blows with their reflections, and the noise floor; the steady sounds stop at a treble edge."""
    blows = knocks([row[:5] for row in BLOWS], crack_db=-7.5, deck_db=3.5, thud_db=6.5)
    sharp = [(s, *np.add(levels_db, echo_db), .2) for s, *levels_db, ms, echo_db in BLOWS]
    fronts = knocks(sharp, crack_db=3.5, deck_db=-0.5, thud_db=9.5)   # the walls return mostly the sharp front
    echo = room(fronts)
    ticks = axle_ticks(tick_db=-17.5, rattle_db=4.5, jingle_db=5.5, knock_db=1.0)

    roll = (rolling() + extra_tones()) * amp([[ROLL_PAN_DB / 2], [-ROLL_PAN_DB / 2]])
    # the sharpest edge of a blow and of its echo passes the ports
    echo_heard = ports(echo) + amp(-2) * band(echo, 10500, 14000)
    blow_edge = amp(-3) * band(blows, 11500, 15500)
    steady = roll + sheen() + scrape() + drag() + echo_heard + air()
    edged = signal.sosfilt(signal.cheby2(14, 50, TREBLE_STOP_HZ, fs=SR, output="sos"), steady)
    return edged + ports(np.array([blows + ticks] * 2)) + blow_edge


# The sound dips or drops out; overlapping rows add. Columns: start_s, end_s, level_db
DROPOUTS = [(1.41, 1.434, -1), (1.99, 2.031, -1.5), (3.689, 3.735, -3.5), (3.784, 3.926, -10.5),
            (3.794, 3.909, -6.5), (4.153, 4.158, -17)]
LEFT_LAG_SAMPLES = 1
CUTOFF_HZ = 15750


def record(dry):
    """Left side a sample late, brief dips and dropouts, overload clipping, and a steep treble cut."""
    t = np.arange(N) / SR
    dip_db = sum(db * ((t > start) & (t < end)) for start, end, db in DROPOUTS)
    heard = np.array([np.roll(dry[0], LEFT_LAG_SAMPLES), dry[1]]) * amp(dip_db)
    overloaded = np.clip(heard, -.95, .95)
    return signal.sosfilt(signal.cheby2(12, 60, CUTOFF_HZ, fs=SR, output="sos"), overloaded)


dry = scene()
out = record(dry)
transcribe(out)
```